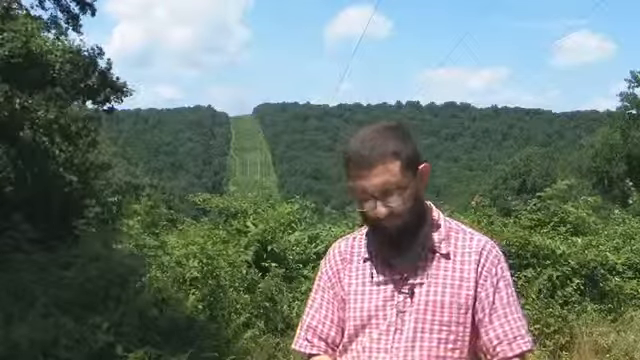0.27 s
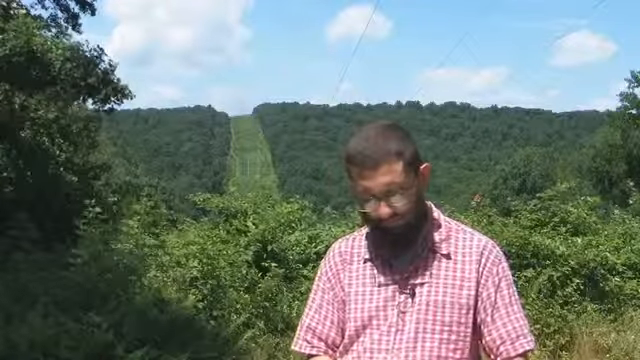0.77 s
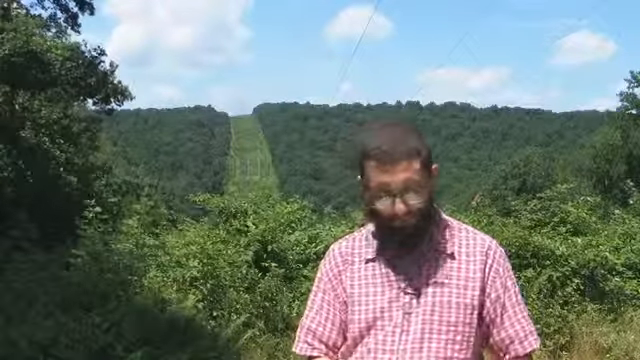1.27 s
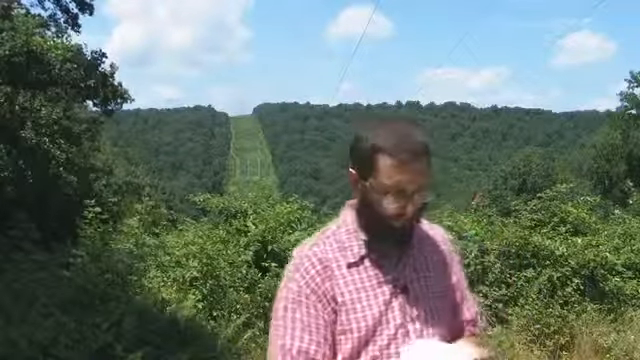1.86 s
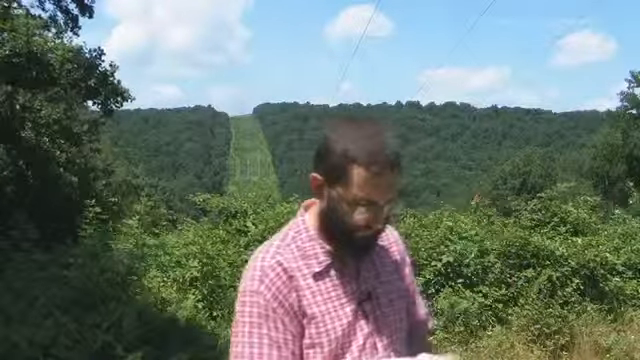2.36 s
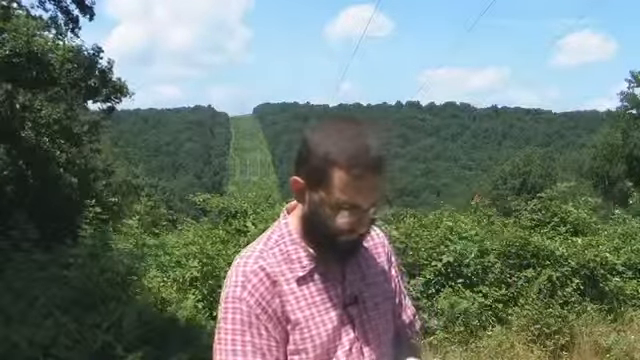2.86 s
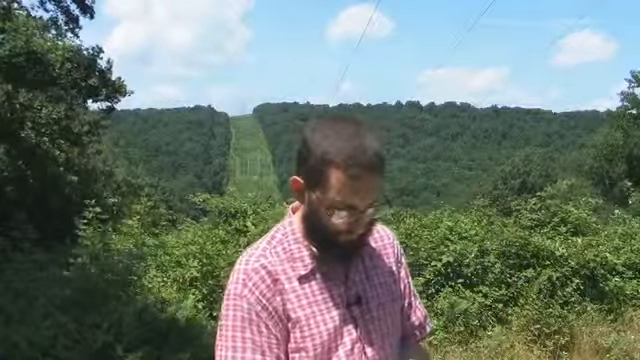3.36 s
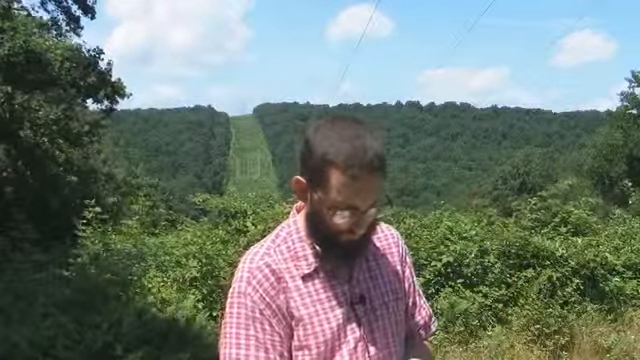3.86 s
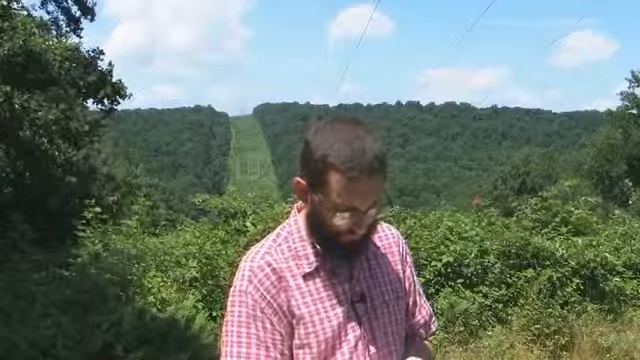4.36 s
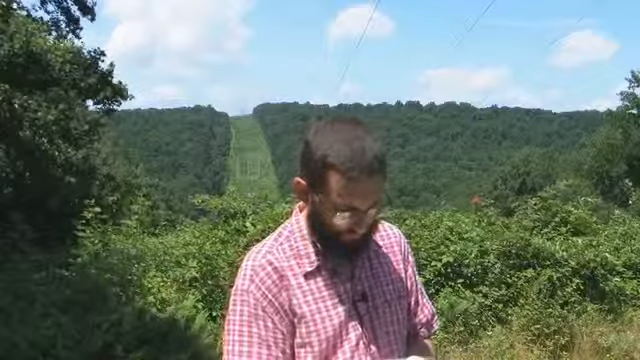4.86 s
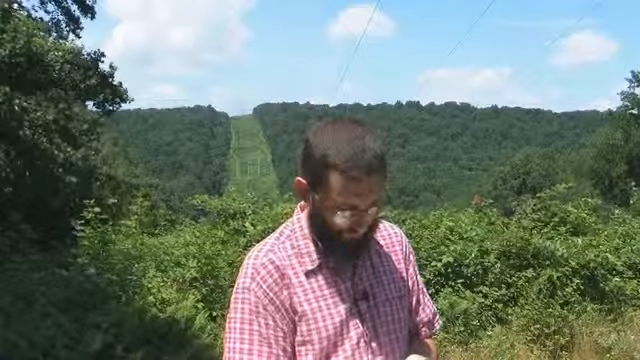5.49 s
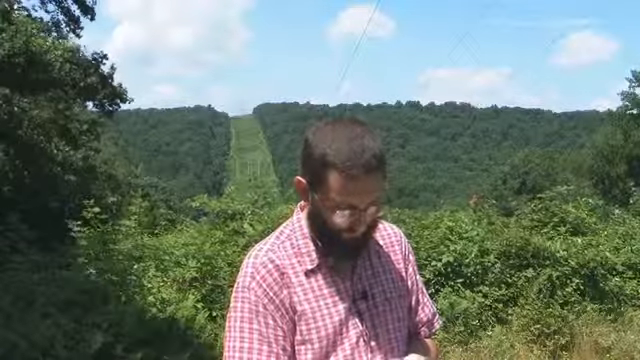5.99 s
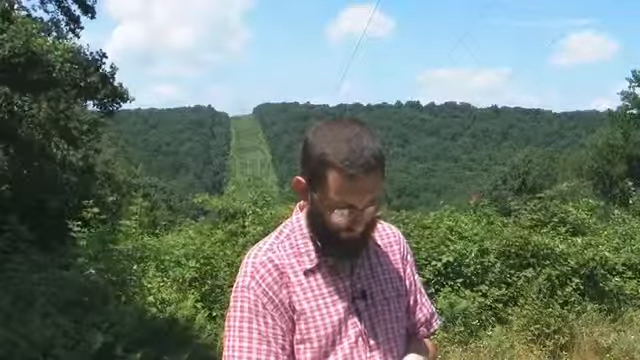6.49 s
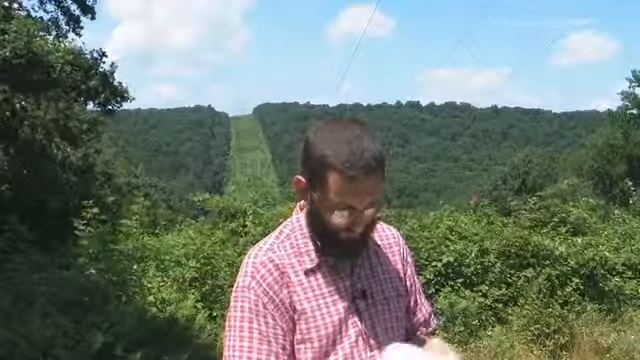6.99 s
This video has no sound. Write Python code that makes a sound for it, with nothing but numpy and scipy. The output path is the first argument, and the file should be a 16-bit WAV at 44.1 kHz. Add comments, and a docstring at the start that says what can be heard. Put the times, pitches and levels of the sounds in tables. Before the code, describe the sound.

Book pages slide and crackle softly outdoors, with one hard double snap early on, over a fast, steady high insect chirp and leafy hiss.

```python
"""Book pages slide, buckle in small snaps and flick hard once in a summer field; page edges swish.
An insect chirps high and evenly in the brush, fainter ones farther off; leaves hiss, late puffs hit the microphone.
Paper is short pops, ringing grains and noise swells; insects are raspy gliding tones; air is coloured noise.
The microphone hears in mono: both channels carry the same scene, each with its own faint treble hiss."""
import sys
import numpy as np
from scipy import signal
from scipy.fft import rfft, irfft, next_fast_len
from scipy.io import wavfile
from scipy.ndimage import uniform_filter1d, map_coordinates

SR = 44100
rng = np.random.default_rng(int(sys.argv[2]) if len(sys.argv) > 2 else 0)


def persist_wave(psi):
    """Save psi, clipped to +-1, as 16-bit WAV."""
    counts = np.round(np.clip(psi, -1, 1) * 32767).astype(np.int16)
    wavfile.write(sys.argv[1], SR, np.atleast_2d(counts).T)


N = 319284
TIME = np.arange(N) / SR

# pages sliding, a stroke a row: fastest moment [t/s], level there before the slide trim [level/dB],
# rise [t/s], fall [t/s], bass corner of the rustle [f/Hz]
SLIDE_STROKES = [(1.58, -45, .16, 0.029, 600), (2.005, -46, .15, .024, 600), (2.69, -52, .11, .05, 500),
                 (2.787, -44.5, 0.021, 0.026, 1100), (3.141, -45.5, .008, .014, 900),
                 (3.185, -43, .012, .02, 900), (3.252, -43, 0.0058, .01, 899),
                 (3.31, -46.5, 0.025, 0.044, 1300), (3.59, -56.5, .2, 0.056, 900),
                 (4.602, -48.5, .04, 0.045, 798), (5.225, -41, .005, .018, 1300),
                 (5.262, -39.5, .012, 0.019, 1400), (5.798, -50.5, 0.019, 0.044, 1100),
                 (6.307, -49, 0.0095, 0.013, 800)]


def amp(db):
    """Decibels to gain."""
    return 10 ** (np.asarray(db) / 20)


def unit(x):
    """Scale to rms 1."""
    return x / np.sqrt(np.mean(x ** 2) + 1e-20)


def gain(points, hz):
    """Gain of (f/Hz, level/dB) points joined on a log frequency axis."""
    f, db = np.transpose(points)
    return amp(np.interp(np.log(hz + 1), np.log(f + 1), db))


def curves(rows, t=TIME):
    """Each column after the time, read at the times t."""
    s, *cols = np.transpose(rows)
    return [np.interp(t, s, c) for c in cols]


def wobble(knots_per_s):
    """Smooth random curve through random knots."""
    knots = rng.standard_normal(int(N * knots_per_s / SR) + 4)
    return map_coordinates(knots, [TIME * knots_per_s])


def bell(t, half_s):
    """Gaussian swell centred on t = 0, half_s its standard deviation."""
    return np.exp(-.5 * (t / half_s) ** 2)


def filtered(x, response):
    """x times a response of frequency, padded against wrap-around."""
    m = next_fast_len(N + SR // 2)
    return irfft(rfft(x, m) * response(np.fft.rfftfreq(m, 1 / SR)), m)[..., :N]


def noise(spectrum):
    """Coloured noise of rms 1."""
    return unit(filtered(rng.standard_normal(N), lambda hz: gain(spectrum, hz)))


def resonance(hz, centre_hz, q):
    """Gain of one broad resonance."""
    ratio = (hz + 1) / centre_hz
    return 1 / np.hypot(1, q * (ratio - 1 / ratio))


def add(track, s, sound):
    """Mix a sound in from time s on."""
    start = max(round(s * SR), 0)
    part = track[start:start + len(sound)]
    part += sound[:len(part)]


def at_level(sound, db):
    """Give a click the energy of 4 ms at this level."""
    return sound / np.linalg.norm(sound) * amp(db) * np.sqrt(.004 * SR)


def pop(colour, low_hz, high_hz, size=1024):
    """Causal pulse of a paper patch flipping over: its size sets the low edge, its speed the high edge."""
    hz = np.fft.rfftfreq(size, 1 / SR) + 1
    band = 1 / np.sqrt((1 + (low_hz / hz) ** 6) * (1 + (hz / high_hz) ** 6))
    # minimum phase by folding the cepstrum
    cepstrum = irfft(np.log(gain(colour, hz) * band + 1e-4))
    cepstrum[1:size // 2] *= 2
    cepstrum[size // 2 + 1:] = 0
    return irfft(np.exp(rfft(cepstrum)))


def effort(t, rise_s, fall_s):
    """A stroke gathers speed up to t = 0, then the page comes to rest."""
    return np.exp(np.minimum(t / rise_s, -t / fall_s))


def small_buckles(count=40, rate_per_s=60, over_stroke_db=2, scatter_db=2.5, pitch_spread=.25):
    """A sliding page buckles at random, harder the faster it moves; columns as for the clear buckles."""
    low_hz, high_hz = 1090, 3800  # median band
    rows = []
    for peak_s, db, rise_s, fall_s, _ in SLIDE_STROKES:
        t = np.cumsum(rng.exponential(size=count)) / rate_per_s - 2 * rise_s
        strength, pitch = rng.standard_normal((2, count))
        level = amp(db + over_stroke_db + scatter_db * strength) * effort(t, rise_s, fall_s)
        scale = np.exp(pitch_spread * pitch)
        for s, g, k in zip(t, level, scale):
            if s < 2 * fall_s:
                rows.append((peak_s + s, 20 * np.log10(g), low_hz * k, high_hz * k))
    return rows


def snaps(crumple_s=.0009, spiky_db=4, crumple_share=.63):
    """Each buckle is one pop inside a crumple of tiny ones that swells and fades within milliseconds."""
    # clear buckles: t/s, level over 4 ms/dB, lowest f/Hz, highest f/Hz
    clear_buckles = [(.510, -44.5, 967, 9000), (1.486, -46, 740, 7200), (1.515, -43.5, 740, 3300),
                     (1.5605, -42, 1110, 3000), (1.5726, -39.5, 500, 6400), (1.8784, -42, 600, 1390),
                     (1.882, -38.5, 567, 6400), (1.999, -41, 500, 5800), (2.014, -39, 1260, 4100),
                     (2.02, -40, 500, 5800), (2.0646, -38.5, 2400, 5000), (2.2562, -46.5, 2400, 3300),
                     (2.744, -43, 1100, 3300), (2.781, -41, 1400, 3600), (2.7852, -34.5, 1710, 3580),
                     (2.8188, -45.5, 1600, 2400), (3.249, -36, 1300, 3700), (3.281, -35.5, 2800, 3910),
                     (3.3035, -36.5, 2100, 4600), (3.3216, -44, 1600, 8100), (3.576, -43.5, 970, 2400),
                     (3.6342, -40.5, 648, 5200), (4.1715, -42.4, 735, 2700), (4.1833, -42, 1600, 2100),
                     (4.549, -42.5, 850, 3300), (4.5845, -38.5, 570, 5200), (4.633, -38.5, 1410, 2990),
                     (4.65, -42, 740, 2400), (5.2214, -35, 1500, 4370), (5.2344, -37, 1104, 3300),
                     (5.2468, -40.5, 2320, 7250), (5.2509, -38, 1500, 6000), (5.2579, -34, 1414, 4600),
                     (5.2802, -40.5, 1400, 3000), (5.2863, -42, 2900, 4970), (5.7825, -41.5, 1600, 3300),
                     (5.8369, -38, 1400, 2700), (6.2287, -40, 1050, 3180), (6.2933, -43, 1600, 5200),
                     (6.3187, -40.5, 1110, 9000), (6.3747, -38, 3000, 8000), (6.3834, -43, 1300, 5800),
                     (7.1336, -48, 1700, 2400)]
    # radiation of the loose sheet: f/Hz, level/dB
    sheet_colour = [(100, -22), (400, -5.5), (1100, 1), (4400, 0), (5600, -5), (8000, -7), (14000, -16)]
    out, t = np.zeros(N), np.arange(SR // 25) / SR
    for s, db, low_hz, high_hz in list(clear_buckles) + small_buckles():
        sign, size = rng.standard_normal((2, len(t)))
        force = sign * amp(spiky_db * size) * t * np.exp(-t / crumple_s)
        # split the energy of the force: crumple, then single pop
        force *= np.sqrt(crumple_share) / np.linalg.norm(force)
        force[round(crumple_s * SR / 2)] += np.sqrt(1 - crumple_share)
        sound = signal.fftconvolve(force, pop(sheet_colour, low_hz, high_hz))
        add(out, s - crumple_s / 2, at_level(sound, db))
    return out


def flick(flutter_db=-14, flutter_t60_s=.012):
    """A taut page pops over and strikes the next; the sheet shivers for a moment after each pop."""
    # hard pops: t/s, level over 4 ms/dB, lowest f/Hz, highest f/Hz
    hard_pops = [(1.6111, -19.5, 714, 11000), (1.6136, -20.5, 410, 8500)]
    # radiation of the sheet under tension: f/Hz, level/dB
    taut_colour = [(200, -11.5), (750, -8.5), (1150, 3.5), (2000, 2), (4300, 1), (5400, -16.5),
                   (7200, -13.5), (9000, -26), (13000, -34)]
    out, t = np.zeros(N), np.arange(SR // 25) / SR
    for s, db, low_hz, high_hz in hard_pops:
        force = rng.standard_normal(len(t)) * amp(-60 * t / flutter_t60_s)
        force *= amp(flutter_db) / np.linalg.norm(force)
        force[0] = 1
        sound = signal.fftconvolve(force, pop(taut_colour, low_hz, high_hz))
        add(out, s, at_level(sound, db))
    return out


def slides(grains_per_s=1800, grain_db=3.5, cycles=2.4, spread=.53, mid_hz=2200, soft_hz=5600,
           trim_db=-2.5, size=128):
    """Paper drags over paper: each catch and release rings a small patch for a few cycles at its own pitch."""
    out, t = np.zeros(N), np.arange(size) / SR
    lead_s, length_s = .6, .8
    n = round(length_s * SR)
    f = np.fft.rfftfreq(n, 1 / SR)
    for peak_s, db, rise_s, fall_s, low_hz in SLIDE_STROKES:
        begin_s = peak_s - lead_s
        when, strength, turn = rng.random((int(grains_per_s * length_s), 3)).T[..., None]
        hz = np.minimum(mid_hz * np.exp(spread * rng.standard_normal(when.shape)), SR / 4)
        weight = amp(grain_db * np.minimum(-np.log(1 - strength), 4)) * np.sign(turn - .5)
        ring = np.exp(-np.pi * hz * t / cycles) * np.sin(2 * np.pi * hz * t)
        grains = weight * np.sqrt(hz) * ring
        places = (when * n).astype(int) + np.arange(size)
        rustle = np.bincount(places.ravel(), grains.ravel(), n)[:n]
        # a smaller free flap gives less bass; soft fibres round off the treble
        bass_cut = f ** 2 / np.hypot(f ** 2, low_hz ** 2)
        treble_cut = 1 / (1 + (f / soft_hz) ** 6)
        rustle = unit(irfft(rfft(rustle) * bass_cut * treble_cut, n))
        add(out, begin_s, amp(db + trim_db) * rustle * effort(begin_s + TIME[:n] - peak_s, rise_s, fall_s))
    return out


def swishes(q=.61, grain_db=2, size=4096):
    """Page edges brush past each other: short swells of fine, bright grains."""
    # brushes: t/s, peak rms level/dB, half width t/s, centre f/Hz
    edge_brushes = [(.476, -43, 0.0058, 2880), (0.482, -50, 0.0057, 9000), (.515, -56, 0.013, 5500),
                    (0.567, -56.5, 0.026, 6400), (1.077, -52.5, 0.004, 7000), (2.334, -51.5, 0.0028, 9500),
                    (2.506, -52, 0.0045, 7500), (2.54, -47.5, 0.0044, 6860), (2.59, -44.5, 0.0017, 8400),
                    (2.923, -49, 0.0014, 10000), (2.956, -50, .002, 10000), (3.361, -48, 0.0016, 9000)]
    out, t = np.zeros(N), (np.arange(size) - size // 2) / SR
    hz = np.fft.rfftfreq(size, 1 / SR)
    for s, db, half_s, centre_hz in edge_brushes:
        sign, strength = rng.standard_normal((2, size))
        colour = resonance(hz, centre_hz, q) * gain([(11000, 4), (15000, -15)], hz)
        grains = irfft(rfft(sign * amp(grain_db * strength)) * colour)
        add(out, s + t[0], amp(db) * unit(grains) * bell(t, half_s))
    return out


def chirp(pitch, rasp_db=2.1, waver_hz=35, size=2048):
    """One stroke of the wing's file: a slightly raspy tone that arches and falls."""
    # stroke: t from its middle/s, f at pitch 1/Hz, relative level/dB
    stroke = [(-.015, 7700, -33), (-.009, 7740, -5), (-.003, 7800, -3), (.004, 7860, -4.5),
              (.009, 7680, -7), (.013, 7400, -13.5), (.019, 7050, -38)]
    t = (np.arange(size) - size // 2) / SR
    hz, db = curves(stroke, t)
    rasp, waver = (unit(v) for v in uniform_filter1d(rng.standard_normal((2, size)), size=50))
    phase = 2 * np.pi * np.cumsum(pitch * hz + waver_hz * waver) / SR
    sounding = (t > stroke[0][0]) & (t < stroke[-1][0])
    return np.sqrt(2) * amp(db + rasp_db * rasp) * np.sin(phase) * sounding


def insects(pitch_scatter=.0017, far_scatter_db=3, far_pitch_scatter=.0057, size=2048):
    """The near insect keeps a nearly even beat; far ones keep their own rates, each chirp's level varying."""
    # near pace: t/s, chirp rate/Hz
    near_pace = [(0, 8.46), (1.5, 8.44), (3, 8.54), (4.6, 8.47), (6, 8.54), (7.24, 8.36)]
    # near loudness: t/s, rms level before the stroke's own contour/dB
    near_level = [(0, -45.8), (1.1, -47), (1.8, -54), (2.28, -45), (3.3, -50), (4.6, -47.5), (5.9, -47),
                  (7.24, -51)]
    # far insects: pitch relative to the near one [ratio], period t/s, mean level before the contour/dB
    far_insects = [(.94, .134, -61.5), (.9, .158, -62.5), (1.04, .121, -64.5)]
    first_chirp_s = .034
    out, lead_s = np.zeros(N), size / 2 / SR
    beats = np.cumsum(curves(near_pace)[0]) / SR
    for s in first_chirp_s + np.interp(np.arange(beats[-1]), beats, TIME):
        level = amp(curves(near_level, s)[0])
        add(out, s - lead_s, level * chirp(1 + pitch_scatter * rng.normal()))
    for pitch, period_s, db in far_insects:
        for s in (np.arange(64) + rng.random()) * period_s:
            level = amp(db + far_scatter_db * rng.normal())
            add(out, s, level * chirp(pitch + far_pitch_scatter * rng.normal()))
    return out


def breeze(rush_db=-53.5, fine_db=-62.5, stir_db=.54):
    """Even rush of leaves, fine hiss above it, puffs; a soft rustle of clothing or pages raises rush and hiss once."""
    # noise colours of leaves, fine hiss and puffs: f/Hz, relative level per Hz/dB
    leaf_colour = [(25, -37.5), (130, -12), (290, -4.5), (820, -2.5), (2100, 0), (3000, 0), (4800, -4),
                   (7000, -8.5), (9100, -31), (15000, -87)]
    fine_colour = [(3000, -18), (6000, -3.5), (7500, 2.5), (8700, 1), (11000, -3), (15000, -9.5)]
    puff_colour = [(25, -30), (75, 0), (135, 0), (260, -8), (1500, -80)]
    # wind on the microphone: t/s, peak rms level/dB, half width t/s
    puff_rows = [(6.59, -61, 0.016), (6.655, -65, 0.013), (6.722, -61.5, .016), (7.008, -69, 0.027),
                 (7.092, -65, .018)]
    rustle_s, rustle_peak_db, rustle_half_s = 1.44, 2, .56
    rustle_db = rustle_peak_db * bell(TIME - rustle_s, rustle_half_s)
    rush = amp(rush_db + rustle_db + stir_db * wobble(12)) * noise(leaf_colour)
    hiss = amp(fine_db + rustle_db + stir_db * wobble(13)) * noise(fine_colour)
    puffs = sum(amp(db) * bell(TIME - s, half_s) for s, db, half_s in puff_rows)
    return rush + hiss + puffs * noise(puff_colour)


def scene():
    """Open air gives no echo; both channels carry the same microphone."""
    mono = snaps() + flick() + slides() + swishes() + insects() + breeze()
    return np.array([mono, mono])


def record(dry, hiss_db=-75, top_hz=15100):
    """Each channel adds its own trace of treble hiss; nothing is kept above the band limit."""
    # treble hiss: f/Hz, relative level per Hz/dB
    hiss_colour = [(4000, -120), (4800, -17), (15000, 15)]
    hiss = amp(hiss_db) * np.array([noise(hiss_colour), noise(hiss_colour)])
    return filtered(dry + hiss, lambda hz: hz < top_hz)


dry = scene()
out = record(dry)
persist_wave(out)
```